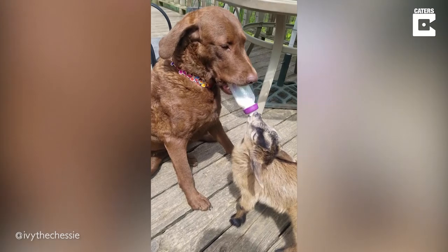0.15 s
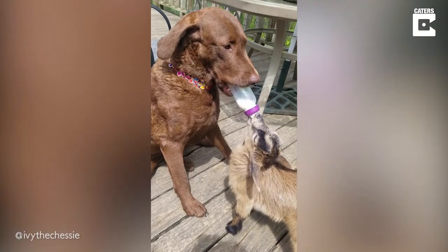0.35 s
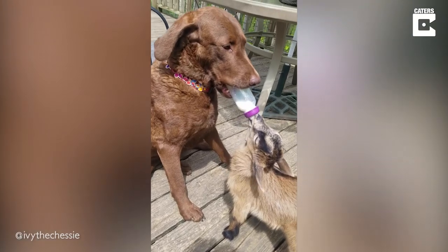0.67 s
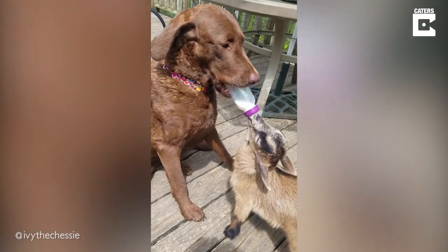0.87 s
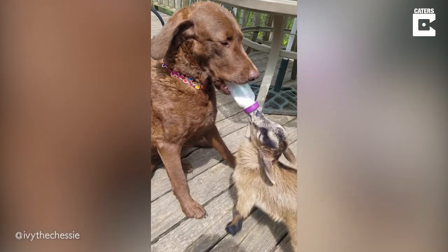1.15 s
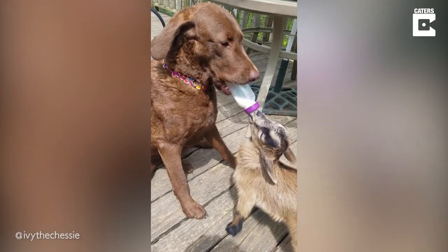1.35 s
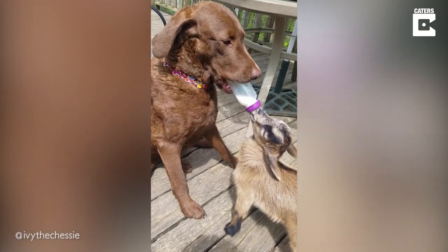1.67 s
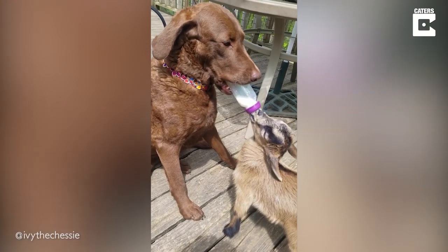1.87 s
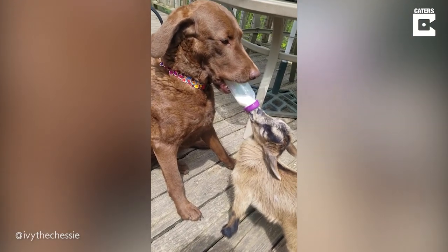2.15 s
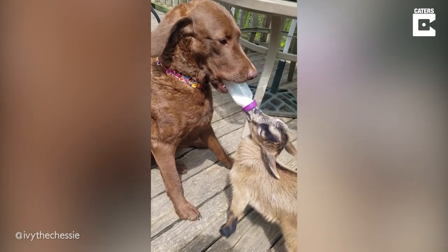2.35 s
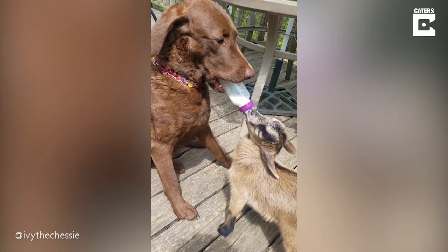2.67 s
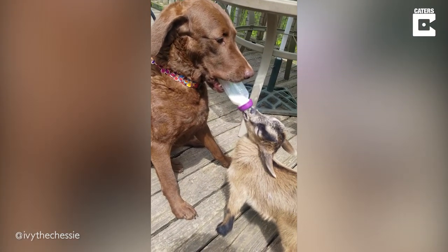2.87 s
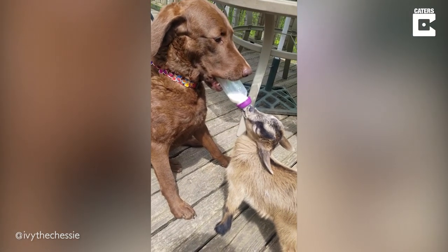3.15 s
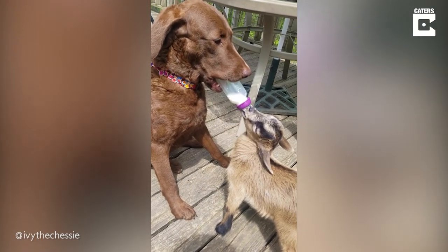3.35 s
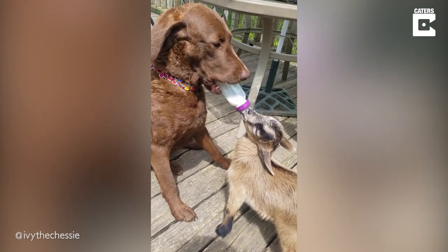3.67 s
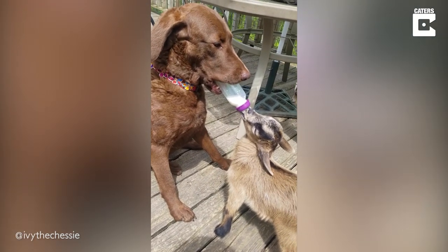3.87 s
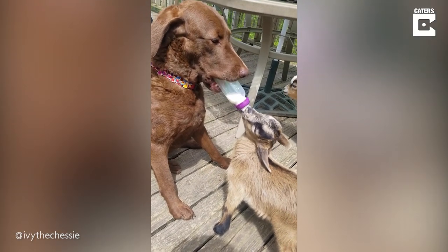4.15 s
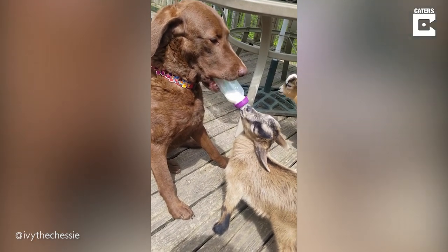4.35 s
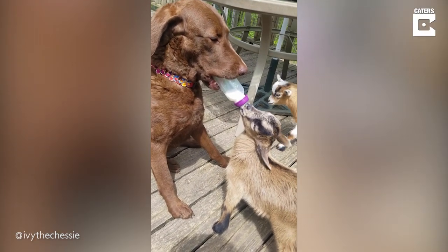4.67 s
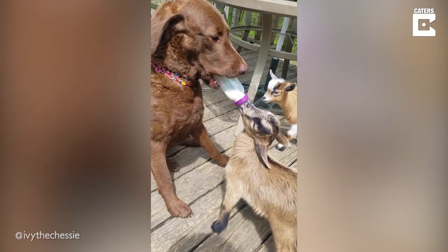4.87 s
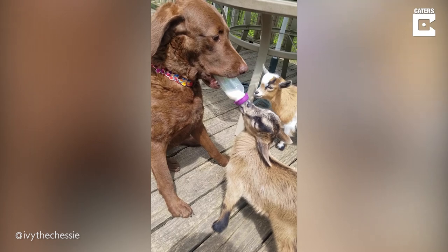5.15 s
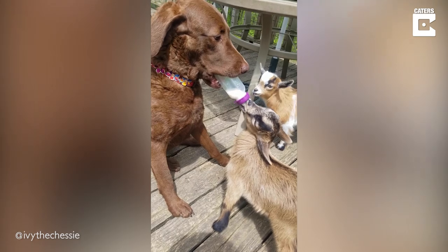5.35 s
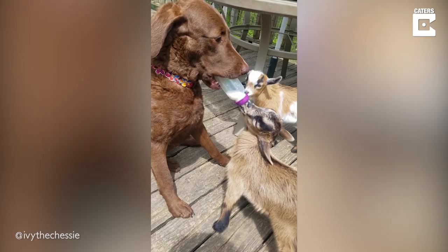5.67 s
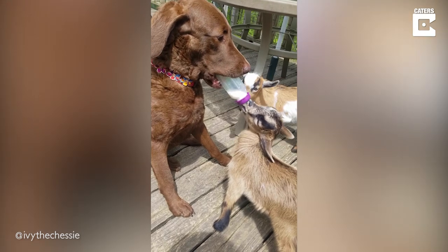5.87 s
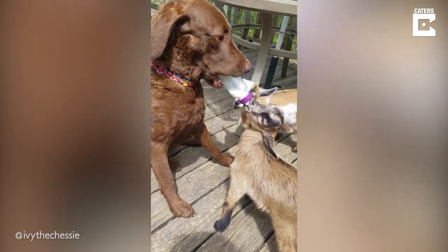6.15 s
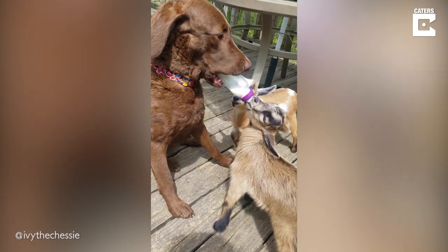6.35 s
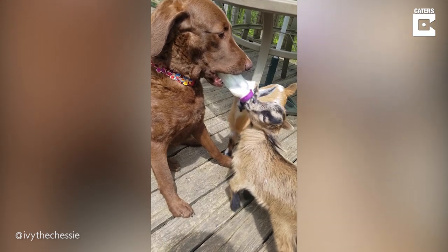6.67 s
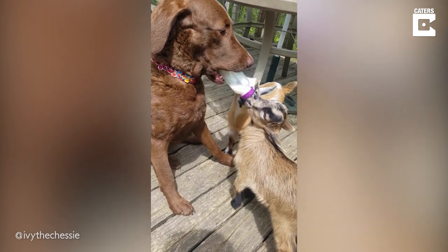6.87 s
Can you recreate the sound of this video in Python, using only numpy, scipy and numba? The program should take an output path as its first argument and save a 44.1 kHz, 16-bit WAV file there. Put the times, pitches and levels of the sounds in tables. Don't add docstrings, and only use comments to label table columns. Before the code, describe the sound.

A hand-held phone hears wind buffeting first, then a cluster of crisp sticky suckling clicks from a young goat, mostly toward the left. The sucking softens midway, then returns sharper, with a hard bright snap late. Muted hooves or gulps knock the boards, faint scuffs brush by, and thin outdoor air swells over a distant machine hum.

```python
import sys
import numpy as np
from scipy import signal
from scipy.fft import rfft, irfft
from scipy.io import wavfile
from scipy.ndimage import uniform_filter1d
from numba import njit

SR = 44100
rng = np.random.default_rng(int(sys.argv[2]) if len(sys.argv) > 2 else 0)


def file_out(sig):
    cols = np.atleast_2d(sig).T
    lim = np.clip(cols, -1, 1)
    pcm = np.round(lim * 32767).astype(np.int16)
    wavfile.write(sys.argv[1], SR, pcm)


def natural_amplitude(level_db):
    exponent = np.asarray(level_db, float) / 20
    return 10 ** exponent


N = 309141

# peak t/s, crackle level/dB, fade/ms, cavity f/Hz
SMACKS = [(0.29, -46.5, 12, 5930), (0.957, -44, 6.7, 7000), (0.647, -52, 15, 6900), (1.093, -44, 9, 6650),
          (1.11, -54, 22, 6000), (5.774, -50, 14, 6000), (1.226, -53, 22, 7100), (1.859, -53, 12, 3330),
          (2.305, -43.5, 14, 5800), (2.847, -42.5, 18, 7460), (3.29, -51, 75, 5800),
          (3.504, -50.5, 73, 5100), (3.559, -41, 22, 4300), (3.759, -46, 35, 4900),
          (5.262, -53.5, 10, 5700), (5.325, -42, 7.6, 4700), (5.5, -48, 27, 6000),
          (5.635, -44.5, 13.4, 6400), (6.03, -54, 6.4, 5760), (6.883, -37, 7.9, 7600)]
# peak t/s, crackle level/dB, half length/ms, cavity f/Hz
PULLS = [(0.396, -39.5, 14, 5600), (0.422, -38.5, 17, 6750), (0.666, -47, 20, 6500), (0.723, -58, 29, 4300),
         (0.938, -47, 19, 6600), (1.152, -43, 14.5, 5200), (1.19, -55, 37, 6040), (1.365, -56, 25, 4300),
         (1.394, -46.5, 7, 4700), (1.407, -47.5, 11, 5600), (2.324, -47, 12, 5000), (3.577, -44, 8, 5500),
         (6.618, -48, 16, 7000), (1.583, -57.5, 24, 5330), (1.684, -56, 25, 6900), (2.165, -54, 35, 7100),
         (3.35, -46.5, 33, 5800), (3.612, -56.5, 23, 6700), (3.79, -57, 18, 3900), (3.814, -42, 13, 4700),
         (3.832, -32.5, 9.2, 6700), (4.346, -38.5, 11, 6000), (4.606, -41.5, 15, 7400),
         (4.889, -49.5, 15.5, 7000), (5.028, -53, 17, 6400), (5.108, -39.5, 19, 6300),
         (5.343, -45.5, 22.6, 6300), (5.598, -47, 14, 6700), (5.618, -45, 12, 6900), (5.797, -49, 14, 7000),
         (5.828, -50, 20, 6500), (5.841, -41, 7, 7200), (6.351, -52.5, 24, 5800), (6.396, -34.5, 9, 8000),
         (6.591, -44.5, 24, 6600), (6.822, -47, 14, 7140), (6.898, -46, 23, 7400)]
# peak t/s, crackle level/dB, fade/ms, cavity f/Hz
SLIDES = [
    (1.331, -61.5, 92, 4950),
    (1.651, -49.5, 14, 6050),
    (1.814, -48, 21, 4900),
    (2.048, -49, 33, 6100),
    (2.386, -42, 36, 6300),
    (2.589, -52, 22, 7600),
    (3.084, -48, 52, 5560),
    (4.307, -53, 48, 3500),
    (4.559, -52.5, 42, 5930),
    (4.8, -50, 34, 6700),
]
# peak t/s, crackle level/dB, swell/ms
CLOSINGS = [
    (0.487, -64, 15),
    (1.455, -55.5, 40),
    (1.94, -54, 43),
    (2.139, -58.5, 29),
    (2.214, -55.5, 15),
    (2.535, -59, 18),
    (4.857, -46.5, 39),
]
# t/s, crackle level/dB
DRIBBLES = [(0.348, -54), (0.869, -58.5), (0.895, -53), (0.979, -54.5), (1.018, -61), (1.888, -51),
            (2.499, -55.5), (3.65, -61), (4.759, -62), (4.921, -61), (5.374, -55), (6.308, -57),
            (6.522, -60), (6.97, -69)]
# f/Hz, level/dB
FILM_SPECTRUM = [(6500, -12.5), (8000, 5), (9300, -45), (10500, -2.5), (11500, -1), (14500, 1), (15600, 8.5),
                 (16000, 4)]
# t/s, peak level/dB, ring f/Hz
SNAPS = [(0.3785, -34, 14600), (0.3917, -22, 14700), (0.4093, -28, 13300), (0.42, -19, 14200),
         (0.4406, -26, 12000), (1.1548, -20, 14200), (1.221, -31.5, 13200), (1.4569, -30.5, 6750),
         (1.86, -26.5, 3630), (3.5625, -29, 3250), (3.8109, -22, 4650), (3.817, -21, 5260),
         (3.825, -24, 5970), (3.8327, -25, 10850), (2.306, -23, 14200), (4.891, -30, 13100),
         (4.343, -21, 15400), (4.6053, -23.5, 11800), (5.105, -19, 14700), (5.112, -22, 11800),
         (5.589, -25, 6200), (5.6193, -20.5, 7000), (5.84, -21.5, 7300), (6.3839, -14, 15100),
         (6.387, -15, 11500), (6.3941, -9, 11200), (6.398, -15, 11900), (6.8784, -23, 7100),
         (6.898, -23.5, 10900), (6.9681, -37, 6300)]
# t/s, peak level/dB, ring f/Hz
THREADS = [(0.3783, -30, 14100), (0.3935, -24, 13700), (0.3979, -22, 14800), (0.4055, -25, 12500),
           (0.4082, -22, 13100), (0.4123, -24, 12400), (0.4224, -21, 12700), (0.6612, -28, 7600),
           (0.9351, -27, 12800), (0.9385, -28, 9200), (1.0911, -30, 6600), (1.0932, -28, 11400),
           (1.0946, -31, 13800), (1.1531, -23, 10600), (1.157, -21, 9300), (1.1692, -31, 9600),
           (1.3932, -26, 5300), (1.4108, -25, 7100), (1.4417, -33, 9300), (1.7075, -36, 12500),
           (1.8581, -32, 4000), (1.9127, -38, 11600), (2.1652, -36, 8400), (2.1789, -34, 11000),
           (2.3093, -28, 14400), (2.3874, -28, 8000), (2.5332, -35, 6200), (2.753, -42, 12400),
           (3.392, -32, 14300), (3.5052, -30, 6400), (3.5608, -25, 5000), (3.6487, -38, 12000),
           (3.762, -28, 14900), (3.8193, -24, 5600), (3.8229, -21, 6900), (3.827, -20, 6900),
           (3.8296, -24, 7200), (3.8342, -13, 9500), (3.8367, -24, 8500), (4.3414, -26, 11400),
           (4.3443, -21, 10700), (4.3458, -28, 6200), (4.5989, -27, 11300), (4.8776, -33, 11300),
           (5.0959, -25, 7000), (5.0996, -23, 9400), (5.1013, -25, 12300), (5.1032, -19, 14000),
           (5.1092, -23, 12200), (5.3229, -28, 5100), (5.5274, -32, 10000), (5.635, -24, 7400),
           (5.7734, -31, 8500), (5.7944, -30, 14800), (6.0288, -36, 10500), (6.3891, -21, 12900),
           (6.3914, -22, 11900), (6.5878, -28, 9100), (6.8823, -24, 8500), (6.8956, -25, 13900)]
# t/s, peak level/dB
PRICKS = [(0.287, -35), (0.4864, -43), (0.9797, -50), (1.09, -45), (1.6781, -42), (1.7065, -46),
          (1.8884, -56), (1.9116, -52), (2.1364, -35), (2.213, -40), (2.2854, -37), (2.4962, -54),
          (2.5321, -56), (2.843, -38), (3.1857, -46), (3.288, -41), (3.6107, -44), (3.755, -35),
          (4.9197, -39), (6.0277, -41), (6.782, -56), (6.8523, -43), (6.967, -53)]
# t/s, peak level/dB, f/Hz
TONGUE_TICKS = [(1.6505, -60.5, 2060), (1.8573, -61.5, 1440), (2.1016, -62.5, 1660), (2.378, -66, 1680),
                (3.5611, -59.5, 1900), (3.6124, -58.5, 1510), (4.6, -64.5, 2090), (4.7806, -66, 1770),
                (5.322, -64, 2500), (3.122, -68, 1900), (3.333, -65, 1250), (4.842, -65, 1800),
                (4.973, -70, 2400), (5.138, -67, 1400), (6.027, -73, 1580), (6.24, -70, 2000),
                (6.304, -71, 2000), (6.39, -66, 1700), (6.522, -73, 1400), (6.585, -65, 1800)]
# t/s, peak level/dB, f/Hz
POCKETS = [(0.8649, -58, 7100), (0.8934, -50, 7110), (1.0345, -58, 6850), (1.2311, -50, 6900),
           (1.925, -57, 6400), (2.0233, -50, 7690), (2.4982, -55, 7150), (2.6539, -62, 7140),
           (2.815, -57, 7460), (2.9093, -55, 7160), (3.0335, -60, 7620), (3.7234, -63, 7400),
           (4.0043, -64, 7820), (4.5047, -63, 6560), (4.7546, -56, 5440), (4.9901, -58, 7720),
           (5.2495, -58, 5630), (5.7214, -60, 6900), (5.7438, -53, 5670), (5.9339, -56, 7820),
           (6.0536, -60, 5460), (6.0916, -60, 6550), (6.2856, -60, 7140)]
# t/s, peak level/dB, plank f/Hz, ring T60/s
KNOCKS = [(0.664, -38.5, 740, 0.088), (1.714, -55, 552, 0.082), (1.856, -49.5, 593, 0.089),
          (2.101, -58.5, 590, 0.053), (2.323, -56.5, 348, 0.11), (2.55, -61, 500, 0.1),
          (3.389, -49.5, 364, 0.25), (3.56, -44.5, 581, 0.048), (4.906, -44, 760, 0.13),
          (5.011, -61, 364, 0.57), (5.321, -48, 527, 0.023), (5.506, -47.5, 579, 0.068),
          (5.993, -61, 700, 0.16), (6.249, -46, 292, 0.14), (6.584, -54.5, 448, 0.26),
          (6.69, -49, 580, 0.061), (0.665, -50, 590, 0.06), (0.666, -56, 955, 0.08),
          (1.724, -54, 587, 0.05), (2.342, -55, 355, 0.08), (2.746, -58, 659, 0.1), (3.216, -60, 565, 0.07),
          (3.337, -55, 334, 0.12), (3.43, -56, 780, 0.1), (3.49, -57, 590, 0.1), (3.64, -56, 590, 0.08),
          (4.582, -60, 444, 0.08), (4.811, -61, 565, 0.04), (5.027, -52, 355, 0.08),
          (6.045, -58, 520, 0.06), (6.157, -58, 660, 0.06), (6.24, -53, 560, 0.09), (6.275, -55, 400, 0.07),
          (6.345, -56, 750, 0.1), (6.511, -54, 417, 0.08), (6.61, -52, 320, 0.07), (6.635, -55, 600, 0.07),
          (6.73, -55, 579, 0.07), (6.789, -57, 525, 0.05)]
# t/s, length/s, level/dB, f/Hz, width/Hz
SCUFFS = [(0.08, 0.25, -65.5, 3700, 1200), (0.1, 0.2, -68, 2900, 800), (0.17, 0.22, -65, 2700, 800),
          (0.74, 0.12, -74.5, 2580, 900), (1.5, 0.14, -76, 2470, 500), (1.672, 0.14, -67, 770, 915),
          (2.328, 0.053, -59.5, 361, 98), (2.521, 0.15, -69, 745, 600), (2.726, 0.084, -63, 646, 80),
          (2.745, 0.089, -63, 335, 120), (4.606, 0.072, -68, 2080, 900), (3.264, 0.3, -61.5, 283, 214),
          (3.33, 0.49, -74, 610, 500), (3.596, 0.089, -62.5, 338, 161), (5.924, 0.36, -69.5, 580, 494),
          (6.095, 0.031, -70, 1390, 300), (0.37, 0.1, -60, 1800, 1500), (5.135, 0.045, -68, 1600, 1300),
          (4.992, 0.07, -57.5, 297, 194), (6.252, 0.14, -66.5, 580, 497), (6.338, 0.033, -68, 710, 121),
          (6.463, 0.28, -63.5, 470, 610), (6.718, 0.049, -62.5, 567, 120), (2.93, 0.32, -70, 2140, 1530),
          (3.314, 0.084, -63, 2000, 1000), (0.635, 0.035, -62, 1950, 300), (0.58, 0.06, -74, 3950, 300),
          (3.605, 0.07, -66, 1450, 500), (6.1, 0.09, -75, 1400, 500), (6.575, 0.07, -69, 1700, 1200),
          (2.76, 0.06, -74, 2900, 500), (4.63, 0.04, -70, 2300, 600), (0.0, 0.012, -64, 1500, 2500)]
# t/s, peak level/dB, f/Hz
PUFFS_LEFT = [(0.004, -26, 62), (0.036, -36, 67.6), (0.063, -31, 72), (0.118, -23, 115), (0.155, -24, 124),
              (0.228, -31.5, 60), (0.274, -37.5, 68.6), (0.313, -40.5, 80), (0.344, -40, 63.5),
              (0.401, -48, 103), (1.74, -44.5, 155), (1.928, -44, 64), (2.181, -46, 60.4),
              (3.36, -44, 69.4), (4.218, -36, 73), (4.268, -45, 67.6), (5.181, -43, 60), (5.221, -39, 54),
              (5.319, -35, 52), (5.368, -33, 65.6), (6.54, -44, 91), (6.637, -46, 97)]
# t/s, peak level/dB, f/Hz
PUFFS_RIGHT = [(0.015, -31.5, 63), (0.054, -21, 125), (0.109, -23, 71), (0.15, -35, 73), (0.949, -49, 60),
               (1.196, -48.5, 58.6), (1.25, -32.5, 68), (1.28, -34.5, 66.5), (1.318, -35, 64),
               (1.588, -44.5, 69.4), (3.819, -44, 75), (6.549, -51, 70)]
BREEZE_LEVELS = [-58.5, -73]
# f/Hz, density level/dB per Hz
AIR_SPECTRUM = [(140, -5), (609, -12.5), (1130, -22.5), (2580, -24.5), (4440, -28.5), (7800, -24),
                (9100, -50), (11200, -24.5)]
# t/s, level/dB
AIR_SWELL = [
    (0, 5.5),
    (.55, 0.5),
    (1.3, 2),
    (2.2, 0.5),
    (3.3, 3.5),
    (4.1, -0.5),
    (5.0, 4),
    (5.8, -1),
    (6.4, 5.5),
    (7.01, 2.5),
]
# f/Hz, level/dB
PHONE_SHADOW = [(800, 8), (1500, 11), (2500, 11.5), (4000, 0), (6000, 5.5), (7700, 2.5), (9000, 9),
                (12000, 7.5)]


def suckling():
    film_gain, mouth_gain = np.zeros(N), np.zeros(N)
    rows = np.array(tears())
    cavity_hz = np.interp(np.arange(N) / SR, rows[:, 0], rows[:, 5])
    glide_octaves, glide_ms = .18, 25
    for s, rise_ms, fall_ms, film_db, mouth_db, peak_hz in rows:
        at = np.arange(int((s - .2) * SR), min(int((s + .3) * SR), N))
        dt_ms = (at / SR - s) * 1e3
        shape = tear(dt_ms, rise_ms, fall_ms)
        film_gain[at] = np.maximum(film_gain[at], natural_amplitude(film_db) * shape)
        glide = peak_hz * 2 ** (glide_octaves * np.tanh(dt_ms / glide_ms))
        strongest = natural_amplitude(mouth_db) * shape > mouth_gain[at]
        cavity_hz[at] = np.where(strongest, glide, cavity_hz[at])
        mouth_gain[at] = np.maximum(mouth_gain[at], natural_amplitude(mouth_db) * shape)
    cavity_hz = uniform_filter1d(cavity_hz, size=200) * (1 + .07 * walk(60))
    patch_hz = 12500 + 2000 * np.tanh(walk(70))
    teat_gain = np.roll(uniform_filter1d(mouth_gain, 1300), 800)
    ragged = natural_amplitude(3.0 * walk(130))
    film_gain = film_gain * natural_amplitude(2.0 * walk(75))
    mouth_gain = mouth_gain * natural_amplitude(2.0 * walk(75))
    teat_gain = teat_gain * natural_amplitude(2.0 * walk(75))
    fizz_db = -76 + 2.6 * walk(20)
    teat_db = -15.5 - 2.0 * np.log2(cavity_hz / 5000)

    def lip_corner():
        spit = crackle(rate=1700, spread_db=3.5, hiss=0.5) * ragged
        film = unit(irfft(rfft(spit) * colour(FILM_SPECTRUM), N))
        film = unit(film + band(film, patch_hz, 2700))
        wide = unit(band(band(spit, 1.38 * cavity_hz, 2.9 * cavity_hz), 4460, 8200))
        narrow = unit(band(band(spit, cavity_hz, 0.45 * cavity_hz), cavity_hz, .4 * cavity_hz))
        cavity = unit(narrow + .6 * wide)
        teat = natural_amplitude(teat_db) * unit(band(band(spit, 2140, 2100), 3100, 3700))
        mouth = mouth_gain * cavity + teat_gain * teat
        fizz = natural_amplitude(fizz_db) * (film + 0.6 * wide)
        return natural_amplitude(-4.0) * film_gain * film + natural_amplitude(-3.5) * mouth + fizz

    return lip_corner(), 0.5 * lip_corner()


def tears():
    pursed_hz = 6700
    rows = [(s, 5.8, ms, db, hz) for s, db, ms, hz in SMACKS]
    rows += [(s, 12.7, ms, db, hz) for s, db, ms, hz in SLIDES]
    rows += [(s, ms, 1.31 * ms, db, hz) for s, db, ms, hz in PULLS]
    rows += [(s, ms, 11, db, pursed_hz) for s, db, ms in CLOSINGS]
    rows += [(s, 8.3, 8.3, db, pursed_hz) for s, db in DRIBBLES]
    return sorted((s, rise, fall, db, db - 3 - 9 * np.log2(hz / 6000), hz)
                  for s, rise, fall, db, hz in rows)


def tear(dt_ms, rise_ms, fall_ms):
    opening = dt_ms < 0
    x = np.abs(dt_ms) / np.where(opening, rise_ms, fall_ms)
    core = natural_amplitude(-10 * x ** np.where(opening, 2.2, 1.3))
    skirt = natural_amplitude(-13 - 4.0 * x ** np.where(opening, 2.6, 1.5))
    return core + skirt


def crackle(rate, spread_db, hiss):
    chance = rng.random((3, N))
    size = natural_amplitude(np.minimum(-spread_db * np.log(chance[1] + 1e-9), 12))
    clicks = (chance[0] < rate / SR) * size * np.sign(chance[2] - .5)
    return unit(clicks) + hiss * rng.standard_normal(N)


def seal_clicks():
    clicks = snaps() + pricks() + tongue_ticks()
    return clicks - 0.6 * band(clicks, 9100, 1800)


def snaps():
    out = np.zeros(N)
    after_s, after_db, detune, top_hz = .0035, -11, 0.25, 15820
    chance = rng.uniform(-1.2, 1, (len(SNAPS), 3))
    neighbours = []
    for (s, db, hz), (a, b, c) in zip(SNAPS, chance):
        later = s + after_s * (1 + 0.35 * a)
        neighbours.append((later, db + after_db + 3 * b, min(hz * (1 + detune * c), top_hz)))
    threads = [(s, db - 2.5, hz) for s, db, hz in THREADS]
    for s, db, hz in SNAPS + neighbours + threads:
        snap = ring(hz, 5.5 / hz + 0.0005, 1.2 / hz)
        snap[3:5] += 0.66 * np.array([1, -1])
        add(out, s - .0002, natural_amplitude(db - 4.5) * snap)
    return out


def pricks():
    out = np.zeros(N)
    for s, db in PRICKS:
        add(out, s, natural_amplitude(db + 4.5) * np.array([0.29, -0.65, -0.55, 0.088]))
    return out


def tongue_ticks():
    out = np.zeros(N)
    for s, db, hz in TONGUE_TICKS:
        add(out, s, natural_amplitude(db + 15.0) * ring(2.6 * hz, .003, .0001))
        add(out, s, natural_amplitude(db + 15.0) * ring(hz, 0.01, 0.00039))
        add(out, s, natural_amplitude(db + 11.5) * ring(1.337 * hz, 0.01, 0.00023))
    return out


def strays(count=40):
    out = np.zeros(N)
    for when, size, pitch in rng.random((count, 3)):
        hz = 7500 * 2 ** (1.6 * pitch - .8)
        db = -55 - 3.5 * np.log(size + 0.031)
        add(out, when * (N / SR - .01), natural_amplitude(db) * ring(hz, 12 / hz, 1 / hz))
    return out


def pockets():
    out = np.zeros(N)
    t = np.arange(int(.06 * SR)) / SR
    noises = rng.standard_normal((len(POCKETS), len(t)))
    for (s, db, hz), noise in zip(POCKETS, noises):
        centre, width = np.full(len(t), 1. * hz), np.full(len(t), .3 * hz)
        hiss = unit(svf(svf(noise, centre, width), centre, width))
        fade = natural_amplitude(db - 3 - 20 * t / .025)
        add(out, s, fade * np.minimum(t / .002, 1) * hiss)
    return out


def knocks():
    out = np.zeros(N)
    modes = [(1.0, -1.0), (.93, -9.5), (0.621, -14.5), (1.29, -14), (2.5, -24.0)]
    shudder = unit(band(rng.standard_normal(N), 500, 390))
    t = np.arange(int(.2 * SR)) / SR
    for s, db, hz, t60 in KNOCKS:
        for ratio, mode_db in modes:
            add(out, s, natural_amplitude(db + mode_db) * ring(ratio * hz, t60 / np.sqrt(ratio), 0.0011))
        add(out, s, natural_amplitude(db - 15 - 60 * t / (2.6 * t60)) * shudder[int(s * SR):][:len(t)])
    return out


def scuffs():
    out = np.zeros(N)
    grit = crackle(rate=900, spread_db=2.5, hiss=.9) * natural_amplitude(2.0 * walk(30))
    for s, length, db, hz, width in SCUFFS:
        i, n = int(s * SR), int(length * SR)
        scrape = band(band(grit, hz, width), hz, 2 * width)[i:i + n]
        add(out, s, natural_amplitude(db + 3.5) * unit(scrape) * np.hanning(n) ** 0.94)
    return out


def puffs():
    out = np.zeros((2, N))
    flutter = unit(band(band(band(rng.standard_normal(N), 107, 90), 98, 83), 158, 190))
    half_s = .06
    t = np.arange(-int(half_s * SR), int(half_s * SR)) / SR
    for port, rows in enumerate([PUFFS_LEFT, PUFFS_RIGHT]):
        for (s, db, hz), turn in zip(rows, rng.random(len(rows))):
            cycles = hz * t + 0.45 * np.tanh(2.52 * hz * t)
            swing = np.cos(2 * np.pi * (turn + 0.63 * cycles)) / np.cosh(hz * t / 0.59)
            rough = natural_amplitude(-21) * flutter[int(s * SR):][:len(t)] * np.exp(-(t / 0.035) ** 2)
            skip = max(int((half_s - s) * SR), 0)
            add(out[port], max(s - half_s, 0), natural_amplitude(db) * (swing + rough)[skip:])
    return out


def breeze():
    out = []
    for db in BREEZE_LEVELS:
        level = natural_amplitude(db + 2.0 * walk(7.3))
        rumble = band(band(rng.standard_normal(N), 55.8, 50), 55.8, 50)
        out.append(level * unit(band(rumble, 68, 54)))
    return np.array(out)


def far_machine():
    tilt = natural_amplitude(np.array([[2.5], [-2.5]]))
    return natural_amplitude(-66 + 1.5 * walk(13)) * pair(hz=117.5, width=16, share=.6) * tilt


def farm_air():
    hz_at, db_at = np.transpose(AIR_SPECTRUM)
    swell = np.interp(np.arange(N) / SR, *np.transpose(AIR_SWELL))
    out = 0
    for hz in 140 * 2 ** (np.arange(28) / 4):
        density_db = np.interp(np.log(hz), np.log(hz_at), db_at)
        db = density_db + 10 * np.log10(hz) + swell + 2.6 * walk(12)
        out = out + natural_amplitude(db) * pair(hz, 0.24 * hz, 0.24)
    out = natural_amplitude(-67) * unit(out) * natural_amplitude(np.array([[1.5], [-1.5]]))
    return out + natural_amplitude(-89 + 4.1 * walk(6)) * pair(hz=3950, width=400, share=0.2)


def pair(hz, width, share):
    mid = unit(band(band(rng.standard_normal(N), hz, width), hz, width))
    side = unit(band(band(rng.standard_normal(N), hz, width), hz, width))
    share = np.clip(share, 0, 1)
    return np.sqrt((1 + share) / 2) * mid + np.sqrt((1 - share) / 2) * side * np.array([[1], [-1]])


def ring(hz, t60, rise):
    t = np.arange(int((t60 + rise) * SR)) / SR
    x = np.sin(2 * np.pi * hz * t) * (1 - np.exp(-t / rise)) * np.exp(-np.log(1000) * t / t60)
    return x / np.max(np.abs(x))


def add(out, s, x):
    i = int(s * SR)
    out[i:i + len(x)] += x[:N - i]


def walk(rate):
    k = int(SR / rate)
    steps = np.repeat(rng.standard_normal(N // k + 1), k)
    return unit(uniform_filter1d(uniform_filter1d(steps, k), k)[:N])


def unit(x):
    return x / np.sqrt(np.mean(x ** 2))


def colour(table):
    hz, db = np.transpose(table)
    bin_hz = np.arange(N // 2 + 1) * SR / N
    return natural_amplitude(np.interp(np.log(bin_hz + 1), np.log(hz), db))


def band(x, hz, width):
    return svf(x, np.clip(hz + np.zeros(N), 20, .45 * SR), width + np.zeros(N))


@njit
def svf(x, hz, width):
    y, b, l = np.empty(len(x)), 0., 0.
    for i in range(len(x)):
        g, k = np.tan(np.pi * hz[i] / SR), width[i] / hz[i]
        v = (b + g * (x[i] - l)) / (1 + g * (g + k))
        b, l, y[i] = 2 * v - b, l + 2 * g * v, k * v
    return y


def ports(x):
    t60, lead = .04, 3.49
    t = np.arange(int(t60 * SR)) / SR
    tails = rng.standard_normal((2, len(t))) * np.exp(-np.log(1000) * t / t60) * (t > .0012)
    tails *= natural_amplitude(-7) / np.sqrt(np.sum(tails ** 2, axis=1, keepdims=True))
    delay = np.exp(-2j * np.pi * lead * np.arange(N // 2 + 1) / N)
    late = irfft(rfft(x) * delay, N)
    left, right = np.array([x, late]) + signal.fftconvolve(x[None], tails, axes=1)[:, :N]
    return np.array([left, irfft(rfft(right) / colour(PHONE_SHADOW), N)])


def scene():
    common, apart = suckling()
    kid = common + seal_clicks() + strays() + pockets()
    near = ports(kid + knocks() + scuffs()) + ports(apart) * np.array([[1], [-1]])
    return near + puffs() + breeze() + far_machine() + farm_air()


def top_cut(x):
    return signal.sosfilt(signal.butter(12, 16990, fs=SR, output="sos"), x)


def record(dry):
    dipped = dry - 0.18 * np.array([band(x, 8830, 1800) for x in dry])
    steep = signal.ellip(10, .3, 55, 15820, fs=SR, output="sos")
    mix = signal.sosfilt(steep, dipped)
    return top_cut(mix)


dry = scene()
out = record(dry)
file_out(out)
```